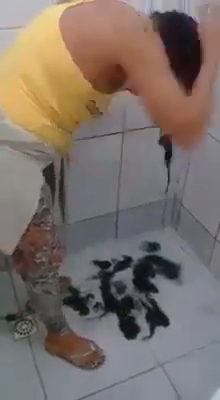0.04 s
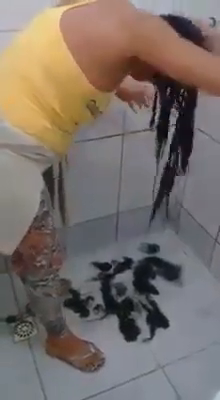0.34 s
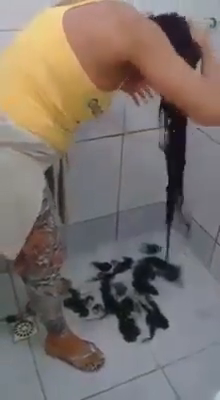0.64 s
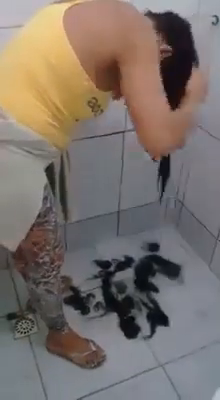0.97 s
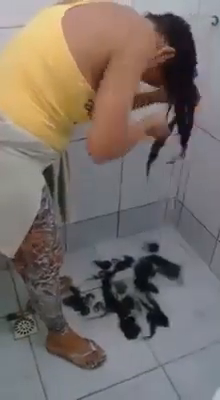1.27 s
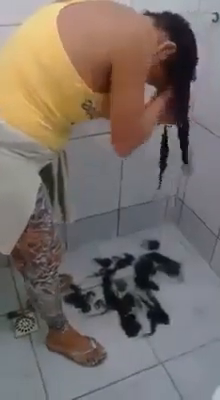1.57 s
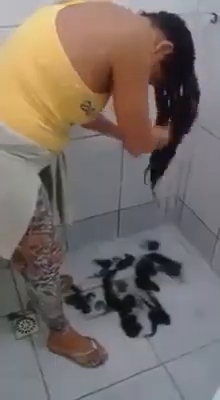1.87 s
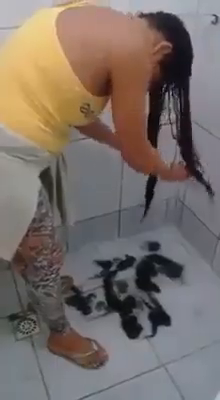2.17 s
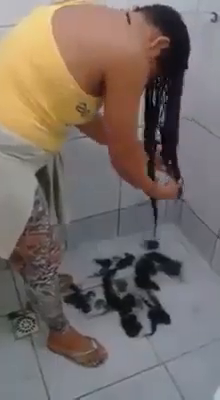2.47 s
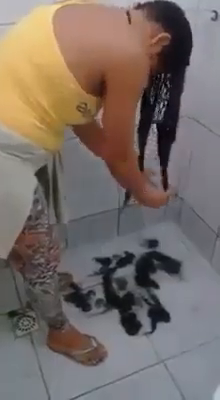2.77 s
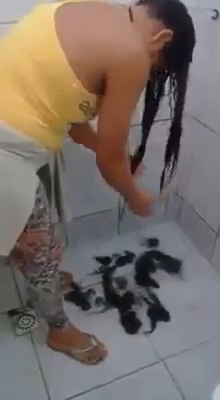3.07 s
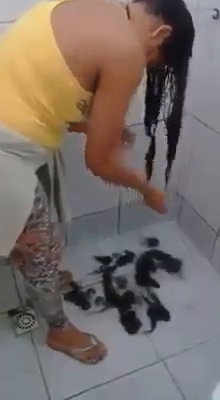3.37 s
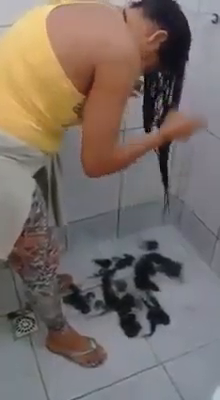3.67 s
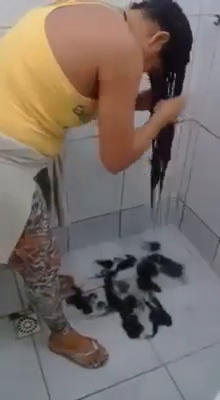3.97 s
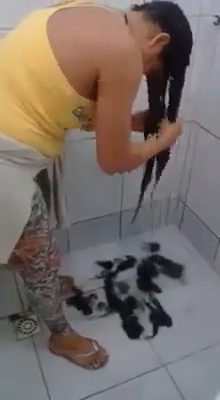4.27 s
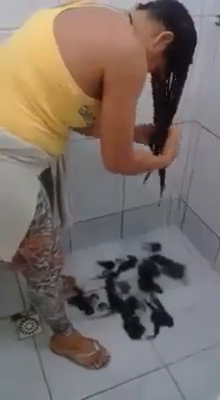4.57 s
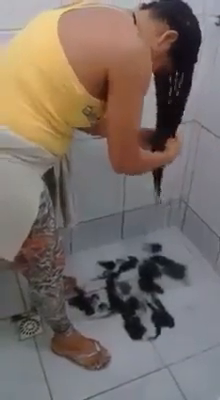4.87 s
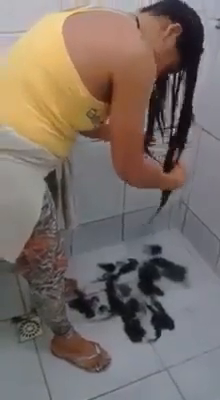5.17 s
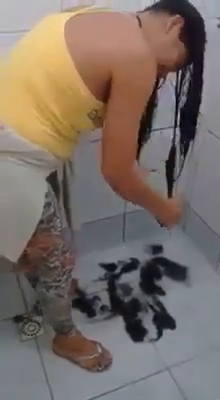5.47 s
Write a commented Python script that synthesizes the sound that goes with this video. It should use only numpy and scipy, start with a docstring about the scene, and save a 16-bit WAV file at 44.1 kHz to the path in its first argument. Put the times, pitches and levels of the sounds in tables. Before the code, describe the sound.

Shower water hisses and patters steadily as someone rinses long hair, with run-off splashing onto a wet tiled floor.

```python
"""Rinsing hair in the shower

A small tiled stall, heard from close by on one microphone, while someone rinses long hair.
Thousands of drops patter on hair and tiles over a hiss of fine spray; the hands gather water
and let it go in gushes. Run-off leaves the hair in spills and hits the wet floor in splats,
splashes and plops. Bubbles ring in the puddle, and the near walls throw the sound back.
A faint rumble comes and goes, and now and then the low end cuts out briefly."""
import sys
import numpy as np
from scipy import signal
from scipy.io import wavfile
from scipy.ndimage import uniform_filter1d

SR = 44100
rng = np.random.default_rng(int(sys.argv[2]) if len(sys.argv) > 2 else 0)


def file_out(sig):
    """Save sig as 16-bit WAV at sys.argv[1]."""
    # one column per channel
    cols = np.atleast_2d(sig).T
    # limit, then scale
    lim = np.clip(cols, -1, 1)
    pcm = np.round(lim * 32767).astype(np.int16)
    wavfile.write(sys.argv[1], SR, pcm)


N = 252232
TIME = np.arange(N) / SR

# colour of water striking tile, below and above the dull gap in the treble: freq_hz, gain_db
PATTER_COLOUR = [(70, -57.5), (150, -52), (320, -24), (700, -20), (880, -13), (1190, -0.64), (2200, -0.1),
                 (2800, 1.4), (3300, 1.25), (3760, -5), (4100, -3), (4470, -2.5), (4720, -17.5)]
FIZZ_COLOUR = [(4700, -10.5), (4900, -6.5), (5300, -5.5), (6600, -6), (7300, -4), (7650, -1), (8600, -3)]
# narrow peaks and dips left by the close walls: centre_hz, width_hz, gain_db
WALL_PEAKS = [(922, 40, 2), (955, 25, -3), (1069, 30, 2), (1100, 50, -2), (1250, 60, 1), (1440, 60, 1.5),
              (1628, 65, 1.5), (1722, 55, -3.3), (1918, 60, 2.3), (1965, 40, -2.5), (2010, 40, 1.8),
              (2072, 50, -4), (2205, 70, -2.5), (3345, 40, -2.5), (3440, 40, -2), (3570, 80, 2),
              (4075, 35, 2.3), (4910, 70, 2.5), (4975, 40, -2.5), (5010, 40, 2), (5065, 50, -2),
              (6866, 90, 2.5), (7159, 70, 3)]
# how long the stall rings: freq_hz, t60_s
STALL_DECAY = [(200, 0.26), (1500, 0.36), (4000, 0.34), (9000, 0.13)]
# steady flow past the head, growing as the hair soaks: time_s, level_db (before flow_share)
FLOW = [(0, -1.5), (.7, -1.5), (1.15, -1.4), (1.6, -0.5), (2.2, -.5), (2.36, -1), (2.5, -0.4), (3.28, 0.65),
        (3.4, -0.5), (3.52, 0.8), (3.8, 0.4), (4, 1), (4.45, 1.05), (4.75, 0.35), (4.95, 0), (5.72, -0.1)]
# the hands gather water and let it go: release_s, swell_db, drain_s, lull_db (before gush_share)
GUSHES = [(.36, 3, .25, 0), (.8, 1.4, 0.35, 0.5), (1.195, 2.5, 0.058, 2), (1.9, 1.5, 1, 0.5),
          (2.4, 2, 0.3, 2.5), (2.8, 4, 0.035, -1.5), (3.47, 3.5, 0.26, 1), (3.89, 4, 0.27, 2),
          (4.24, 3, 0.42, 0.5), (4.57, 4, 0.12, 1.5), (4.82, 4, 0.11, -1.5), (5.07, 4.5, 0.2, -1),
          (5.51, 4, 0.092, -2.5)]
# how each size of drop follows the water: rest_db, flow_share, gush_share
HEAVY_DROPS, MIDDLE_DROPS, FINE_DROPS = (-1.1, 0.64, 1.65), (-0.63, 1, 0.41), (-3.5, 1.2, 0.055)
# low splatter on the floor, under 800 Hz: time_s, gain_db
FLOOR_SPLATTER = [(0, 0), (.25, -4.5), (.55, -3), (.95, -3), (1.2, -5), (1.35, 0), (1.85, -2.5), (2.15, 2),
                  (2.5, -1), (2.6, -4), (2.76, -1), (2.95, 0.5), (3.15, -3), (3.35, 0.5), (3.55, 0.5),
                  (4.2, 0), (4.8, 0.5), (5.72, -3.5)]
# the fattest blobs of run-off hitting the floor: start_s
FAT_SPLATS = [0.925, 1.375, 1.47, 1.905, 3.775, 4.165, 4.81, 5.63]
# short, faint swells of low rumble: peak_s, level_db, length_s
BASS_SWELLS = [(0.033, -56.5, 0.07), (0.165, -58, 0.093), (0.251, -59, 0.057), (0.338, -59, 0.081),
               (0.465, -61, 0.098), (0.626, -64, 0.13), (0.755, -62, 0.094), (0.846, -60, 0.072),
               (0.984, -56.5, .09), (1.145, -61, 0.064), (1.325, -62, 0.098), (1.661, -60, 0.087),
               (2.11, -57, 0.23), (2.303, -58, 0.15), (2.427, -59.5, 0.075), (2.788, -58, 0.11),
               (2.945, -56, 0.076), (3.375, -62.5, 0.097), (3.615, -56, 0.06), (3.773, -57, 0.16),
               (3.881, -56, 0.078), (4.051, -57.5, .09), (4.248, -56, 0.093), (4.398, -56, 0.052),
               (4.491, -64, 0.12), (4.605, -59, .1), (4.702, -56, 0.081), (4.834, -55, 0.17),
               (4.94, -62, 0.056), (5.034, -61, 0.11), (5.119, -64, 0.1), (5.209, -59.5, 0.093),
               (5.43, -56.5, .12), (5.58, -58, 0.076), (5.705, -57, 0.066)]
# sheets of water spilling off the hair onto the tiles: peak_s, level_db, length_s, lowest_hz
SPILLS = [(0.091, -35.5, 0.06, 1300), (0.43, -36, 0.06, 2350), (0.524, -32, .06, 1510),
          (0.903, -32, 0.047, 1200), (1.021, -32, 0.046, 1900), (1.224, -34, 0.042, 2180),
          (1.431, -39, 0.051, 2420), (1.571, -31.5, 0.12, 1900), (1.946, -32.5, 0.13, 1700),
          (2.449, -32.5, 0.046, 1400), (2.547, -34, .06, 1300), (2.616, -31, 0.077, 2220),
          (2.951, -31, 0.096, 2300), (3.169, -39, 0.11, 2530), (3.303, -31, 0.084, 2400),
          (3.661, -31.5, 0.092, 1800), (3.98, -30.5, 0.086, 2100), (4.054, -31.5, .14, 2600),
          (4.139, -28.5, .19, 2490), (4.36, -32.5, 0.11, 1380), (4.611, -45, .06, 1500),
          (4.909, -35, 0.06, 3000), (5.244, -32.5, 0.087, 1600)]
# small clumps of water slapping the floor: start_s, level_db
SPLASHES = [(0.135, -30), (0.232, -31), (0.339, -25), (0.407, -24), (0.546, -25), (0.734, -29.5),
            (0.888, -24), (1.018, -37), (1.391, -24.5), (1.706, -30), (2.047, -28), (2.573, -23),
            (2.832, -23.5), (3.052, -21), (3.526, -31), (3.973, -32), (4.037, -26.5), (4.429, -24),
            (4.667, -22), (4.901, -24), (5.264, -24), (5.623, -26)]
# heavy gouts landing in the puddle: start_s, level_db, pitch_hz
PLOPS = [(0.4, -30, 1110), (0.475, -28, 1010), (0.887, -33, 1350), (.998, -32.5, 1350), (1.272, -28, 1320),
         (1.493, -26, 1355), (1.605, -32.5, 990), (2.424, -29, 910), (2.445, -31, 860), (2.705, -32, 950),
         (3.505, -30, 900), (3.555, -33, 1170), (3.938, -23, 1300), (4.28, -27, 960), (4.335, -30, 1030),
         (4.885, -23.5, 1090), (5.02, -31.5, 950), (5.137, -26, 1350), (5.541, -34, 1000)]
# single fat drops on bare tile near the microphone: start_s, dry_peak_db
DRIPS = [(1.635, -22), (2.835, -22), (2.995, -21), (3.978, -9), (4.106, -16), (4.325, -16), (4.412, -17),
         (4.513, -12), (4.666, -18)]
# where echoes off the arms and head cancel most: freq_hz, weight
CANCELLING = [(1000, .4), (1450, .55), (1750, .95), (2200, 1.1), (2500, .55), (3100, .45), (3550, .7),
              (4200, .45), (6000, .35)]
# the low end of the whole sound cuts out briefly: middle_s, length_s, quiet_below_hz
LOW_DROPOUTS = [(0.128, 0.023, 550), (0.212, .025, 750), (0.289, 0.048, 815), (0.408, 0.07, 650),
                (0.514, 0.042, 700), (0.815, .02, 450), (1.035, 0.037, 750), (1.215, 0.072, 646),
                (1.712, .035, 550), (1.965, 0.024, 600), (2.626, 0.066, 600), (2.879, 0.061, 700),
                (3.106, 0.1, 517), (3.32, 0.059, 580), (3.927, 0.043, 503), (4.33, .05, 380),
                (4.571, 0.016, 650), (4.902, .03, 520), (5.344, .04, 320), (5.52, .04, 600),
                (5.67, .04, 570)]
TOP_HZ = 8690  # upper edge of the recorder's band


def gain_of(db):
    """Decibels to amplitude."""
    return 10 ** (np.asarray(db) / 20)


def unit_rms(x):
    """Scales to an rms of one."""
    return x / np.sqrt(np.mean(x ** 2) + 1e-20)


def at_hz(points, hz):
    """Reads a spectrum table, joined by lines on a log-frequency axis."""
    freq_hz, value = np.transpose(points)
    return np.interp(np.log(hz + 1), np.log(freq_hz + 1), value)


def at_time(points, t):
    """Reads a level table, joined by lines in time."""
    return np.interp(t, *np.transpose(points))


def add(mix, start_s, sound):
    """Mixes a sound in at start_s."""
    part = mix[max(round(start_s * SR), 0):][:len(sound)]
    part += sound[:len(part)]


def band(x, low_hz, high_hz, order=2):
    """Causal band-pass."""
    return signal.sosfilt(signal.butter(order, [low_hz, high_hz], "band", fs=SR, output="sos"), x)


def patches(shape, bins, frames):
    """Smooth random blotches over frequency and time."""
    return unit_rms(uniform_filter1d(uniform_filter1d(rng.standard_normal(shape), bins, 0), frames, 1))


def impacts(length, per_s, spread_db):
    """Randomly timed clicks, mostly small and a few large."""
    size = gain_of(spread_db * np.minimum(rng.exponential(1, length), 5))
    return size * rng.choice([-1, 1], length) * (rng.random(length) < per_s / SR)


def water_colour(x):
    """Gives clicks the colour of water on tile between close walls."""
    hz = np.fft.rfftfreq(4096, 1 / SR)
    db = np.where(hz < FIZZ_COLOUR[0][0], at_hz(PATTER_COLOUR, hz), at_hz(FIZZ_COLOUR, hz))
    db += sum(peak_db * np.exp(-2 * ((hz - centre) / width) ** 2) for centre, width, peak_db in WALL_PEAKS)
    log_gain = np.log(gain_of(np.r_[db, db[-2:0:-1]]))
    click = np.fft.ifft(np.exp(np.conj(signal.hilbert(log_gain)))).real  # minimum phase: a sharp onset
    return signal.oaconvolve(x, click[:len(hz)])[:len(x)]


def stall(x, wet_db):
    """Reflections off the tiles reach the microphone from 3 ms on; the high treble dies first."""
    n = SR // 2
    echoes = rng.choice([-1., 1.], n) * (rng.random(n) < 3000 / SR) * (TIME[:n] > .003)
    hz, t, spectrum = signal.stft(echoes, SR, nperseg=256)
    decay = gain_of(-60 * t / at_hz(STALL_DECAY, hz)[:, None])
    tail = signal.istft(spectrum * decay, SR, nperseg=256)[1]
    return x + gain_of(wet_db) * signal.oaconvolve(x, tail / np.linalg.norm(tail))[:N]


def patter(spots=10):
    """Drops land on many spots, each with its own path through the stall to the microphone."""
    return unit_rms(sum(stall(impacts(N, per_s=700, spread_db=1.24), wet_db=0) for _ in range(spots)))


def bubbles(per_s=2300, decay_cycles=11, rise=0.043, sizes=36):
    """Small bubbles trapped in the water film ring briefly, rising in pitch."""
    t, out = TIME[:1500], np.zeros(N)
    for hz in np.geomspace(900, 8300, sizes) * rng.uniform(0.95, 1.04, sizes):
        age = t * hz / decay_cycles
        pitch_hz = hz * (1 + rise * np.minimum(age, 4))
        ring = np.exp(-age) * np.sin(2 * np.pi * np.cumsum(pitch_hz) / SR)
        out += hz * signal.oaconvolve(impacts(N, per_s / sizes, spread_db=2), ring)[:N]
    return unit_rms(stall(out, wet_db=-8))


def drop_level(drops, t, gather_s=0.18, release_s=0.031):
    """Level in dB of one drop size: steady flow, plus gushes that gather, break loose and drain."""
    rest_db, flow_share, gush_share = drops
    gushes = sum(
        np.interp(t, [s - gather_s, s, s + release_s, s + release_s + drain_s], [0, -lull_db, swell_db, 0])
        for s, swell_db, drain_s, lull_db in GUSHES)
    return rest_db + flow_share * at_time(FLOW, t) + gush_share * gushes


def spray(level_db=-29.5, bubble_db=-13, tick_db=-8):
    """Drops, bubbles and mist; the jets wander over hair and floor, so the colour shifts in patches."""
    fizz = gain_of(bubble_db) * bubbles()
    wash = water_colour(unit_rms(patter() + fizz + rng.standard_normal(N)))
    # tiny drops near the microphone tick dry and high
    ticks = water_colour(unit_rms(band(impacts(N, per_s=620, spread_db=2.35), 4600, 12000, order=3)))
    mid_rms = np.std(band(wash, 1100, 4500, order=4))
    water = (wash + gain_of(tick_db) * ticks) / mid_rms
    hz, t, spectrum = signal.stft(water, SR, nperseg=512, noverlap=384)
    # the smaller the drop, the higher it sounds; a gush brings mostly heavy ones
    fine = at_hz([(4500, 0), (5100, 1)], hz)[:, None]
    heavy = at_hz([(450, 0), (800, 1), (1050, 1), (1400, 0)], hz)[:, None]
    deep = at_hz([(450, 1), (800, 0)], hz)[:, None]
    middle = 1 - fine - heavy - deep
    db = level_db + middle * drop_level(MIDDLE_DROPS, t) + fine * drop_level(FINE_DROPS, t)
    db += heavy * drop_level(HEAVY_DROPS, t) + deep * at_time(FLOOR_SPLATTER, t)
    db += 2 * heavy * patches((1, len(t)), bins=1, frames=20)  # the run-off is uneven
    db += (0.88 + 1.2 * fine) * patches(db.shape, bins=8, frames=14)  # the jets wander
    db += 2 * deep * np.minimum(2 * patches(db.shape, bins=4, frames=18), 1)  # the low splatter burbles
    db += 0.25 * fine * patches((1, len(t)), bins=1, frames=16)  # the mist comes in puffs
    return signal.istft(spectrum * gain_of(db), SR, nperseg=512, noverlap=384)[1][:N]


def shifting_echoes(x, depth_db=28, threshold=0.52, ramp=0.85):
    """Echoes off the moving arms and head cancel at the microphone in notches that come and go."""
    hz, _, spectrum = signal.stft(x, SR, nperseg=4096, noverlap=3584)
    drift = unit_rms(uniform_filter1d(patches(spectrum.shape, bins=6, frames=8), size=3, axis=0))
    notch = np.clip((at_hz(CANCELLING, hz)[:, None] * drift - threshold) / ramp, 0, 1)
    gain = gain_of(-depth_db * notch)
    gain /= np.sqrt(np.mean(gain ** 2, axis=1, keepdims=True))  # each frequency keeps its mean power
    return signal.istft(spectrum * gain, SR, nperseg=4096, noverlap=3584)[1][:N]


def gurgles(level_db=-60, per_s=45, decay_s=0.012, rise_per_s=0.45, sizes=40):
    """Larger bubbles in the puddle give short, low blips that rise a little in pitch."""
    t, out = TIME[:SR // 6], np.zeros(N)
    envelope = t / decay_s * np.exp(-t / decay_s)
    for hz in np.geomspace(250, 720, sizes) * rng.uniform(0.98, 1.03, sizes):
        blip = envelope * np.sin(2 * np.pi * np.cumsum(hz * (1 + rise_per_s * t)) / SR)
        out += np.sqrt(hz) * signal.oaconvolve(impacts(N, per_s / sizes, spread_db=2), blip)[:N]
    return gain_of(level_db + at_time(FLOOR_SPLATTER, TIME)) * unit_rms(out)


def splats(level_db=-57, fat_db=-46, band_hz=(300, 760), decay_s=0.01):
    """Blobs of run-off smack the wet floor: dull, pitchless knocks that give the water its body."""
    knocks = unit_rms(band(impacts(N, per_s=90, spread_db=1.56), *band_hz, order=5))
    out = gain_of(level_db + at_time(FLOOR_SPLATTER, TIME)) * knocks
    t = TIME[:SR // 8]
    for start_s in FAT_SPLATS:
        smack = unit_rms(band(rng.standard_normal(len(t)), *band_hz, order=5))
        add(out, start_s, gain_of(fat_db) * smack * np.exp(-t / decay_s))
    return stall(out, wet_db=-4)


def bass_swells(band_hz=(107, 300)):
    """Short, faint swells of low rumble come and go."""
    out = np.zeros(N)
    for peak_s, level_db, length_s in BASS_SWELLS:
        swell = np.sin(np.pi * np.minimum(TIME[:SR // 3] / length_s, 1))
        rumble = band(impacts(len(swell), per_s=1200, spread_db=0) * swell, *band_hz, order=5)
        rumble_rms = np.linalg.norm(rumble) / np.sqrt(length_s * SR)
        add(out, peak_s - length_s / 2, gain_of(level_db) * rumble / rumble_rms)
    return out


def spills(top_hz=5000):
    """A sheet of water swells and thins again: a dense, bright patter in the upper mids."""
    out = np.zeros(N)
    for peak_s, level_db, length_s, lowest_hz in SPILLS:
        swell = np.hanning(round(length_s * SR))
        sheet = water_colour(band(impacts(len(swell), per_s=9000, spread_db=1.5), lowest_hz, top_hz))
        add(out, peak_s - length_s / 2, gain_of(level_db) * unit_rms(sheet) * swell)
    return stall(out, wet_db=-8)


def low_dropouts(x, depth_db=-26, edge_s=0.014, edge_share=0.16):
    """The low end of the whole sound cuts out briefly and comes back abruptly."""
    hz, t, spectrum = signal.stft(x, SR, nperseg=512, noverlap=448)
    quiet = np.zeros(spectrum.shape)
    for middle_s, length_s, quiet_below_hz in LOW_DROPOUTS:
        below = np.clip((1 - hz / quiet_below_hz) / edge_share + .5, 0, 1)
        during = np.clip((length_s / 2 - abs(t - middle_s)) / edge_s + .5, 0, 1)
        quiet += np.outer(below, during)
    return signal.istft(spectrum * gain_of(depth_db * quiet), SR, nperseg=512, noverlap=448)[1][:N]


def splashes(decay_s=0.0071, band_hz=(2800, 8700)):
    """Each clump bursts on the floor into a bright, quickly fading cluster of droplets."""
    t, out = TIME[:SR // 8], np.zeros(N)
    for start_s, level_db in SPLASHES:
        cluster = water_colour(band(impacts(len(t), per_s=2300, spread_db=2.5), *band_hz, order=1))
        add(out, start_s, gain_of(level_db) * unit_rms(cluster) * np.exp(-t / decay_s))
    return stall(out, wet_db=-1.5)


def plops(rise_s=0.004, decay_s=0.0088, band_ratio=1.22):
    """A gout slaps the puddle and punches a short-lived cavity, which rings broadly and low."""
    t, out = TIME[:SR // 6], np.zeros(N)
    envelope = (1 - np.exp(-t / rise_s)) * np.exp(-t / decay_s)
    for start_s, level_db, pitch_hz in PLOPS:
        slap = impacts(len(t), per_s=3200, spread_db=1.5)
        cavity = unit_rms(band(slap, pitch_hz / band_ratio, pitch_hz * band_ratio, order=4))
        add(out, start_s, gain_of(level_db) * cavity * envelope)
    return stall(out, wet_db=-5.5)


def drips(lowest_hz=2400):
    """A fat drop on bare tile near the microphone makes one hard tick, which the walls throw back."""
    out = np.zeros(N)
    tick = water_colour(band(signal.unit_impulse(SR // 20), lowest_hz, TOP_HZ))
    for start_s, dry_peak_db in DRIPS:
        add(out, start_s, gain_of(dry_peak_db) * tick / abs(tick).max())
    return stall(out, wet_db=-2)


def scene():
    """All the water at one spot in the stall, the same in both channels."""
    shower = shifting_echoes(spray() + spills())
    water = shower + plops() + splashes() + drips() + gurgles() + splats() + bass_swells()
    return np.tile(low_dropouts(water), (2, 1))


def record(dry):
    """The recorder cuts off steeply above TOP_HZ."""
    low_pass = signal.firwin(1023, TOP_HZ, window=("kaiser", 9), fs=SR)
    return signal.oaconvolve(dry, low_pass[None], "same")


dry = scene()
out = record(dry)
file_out(out)
```